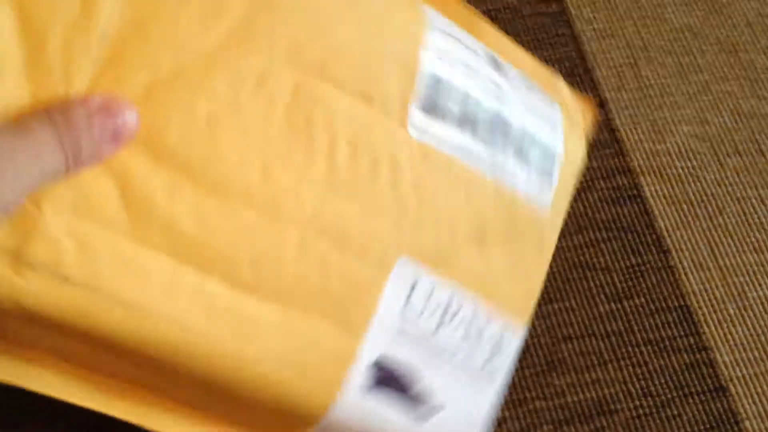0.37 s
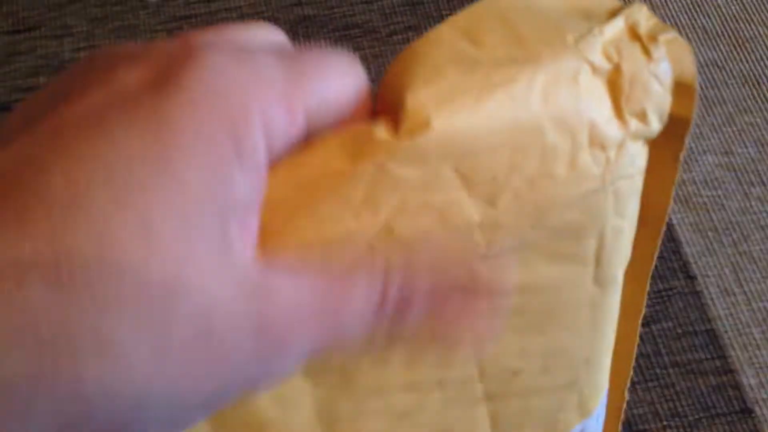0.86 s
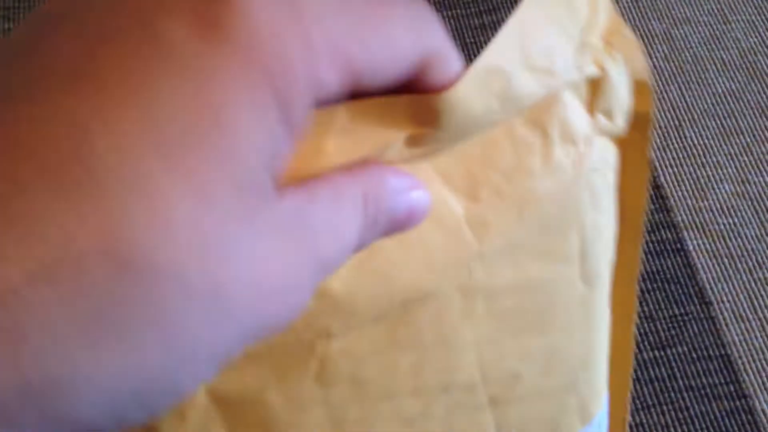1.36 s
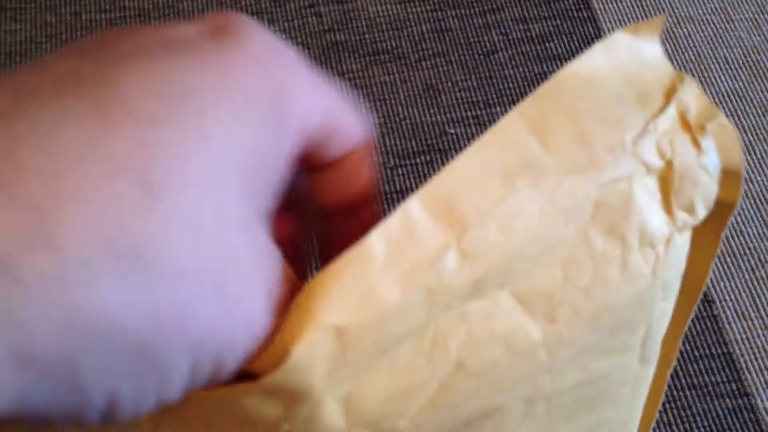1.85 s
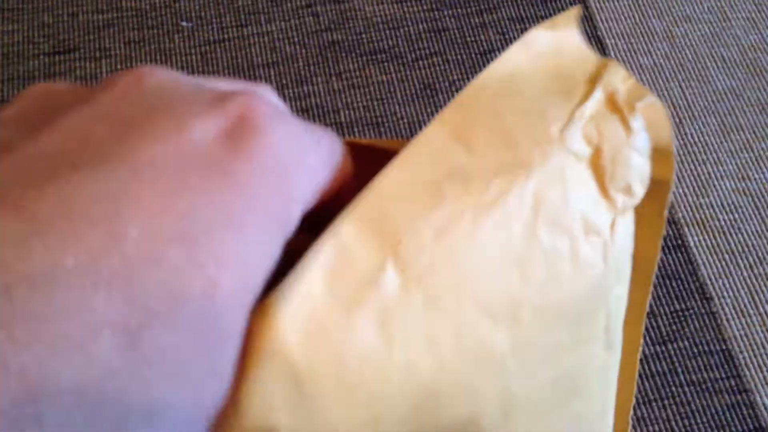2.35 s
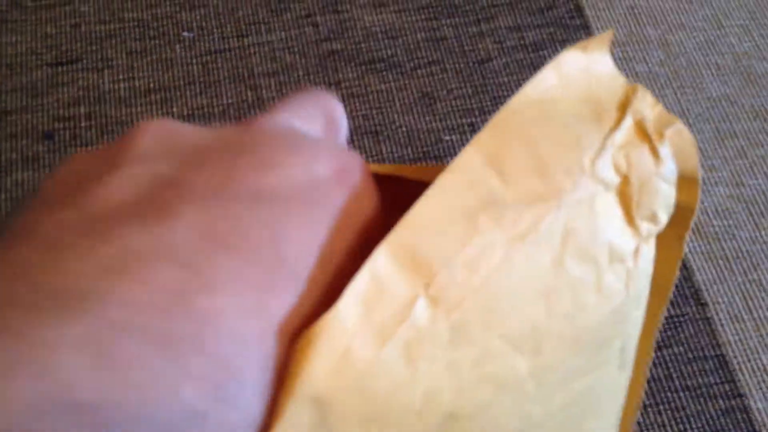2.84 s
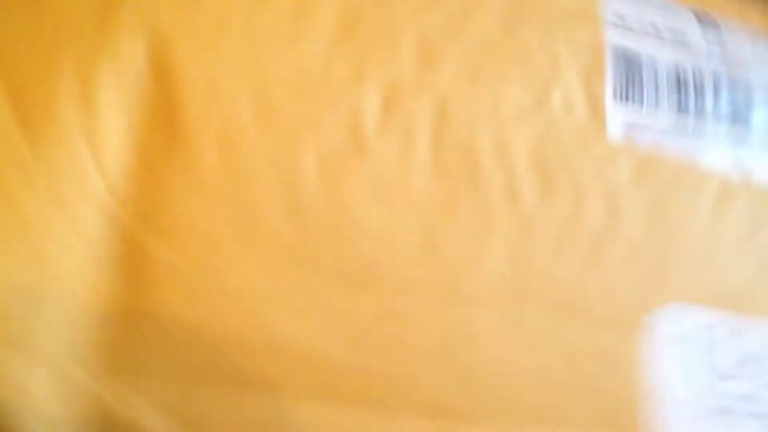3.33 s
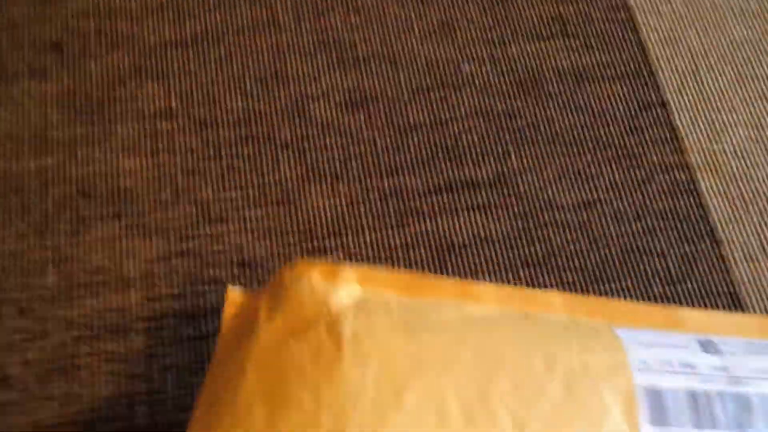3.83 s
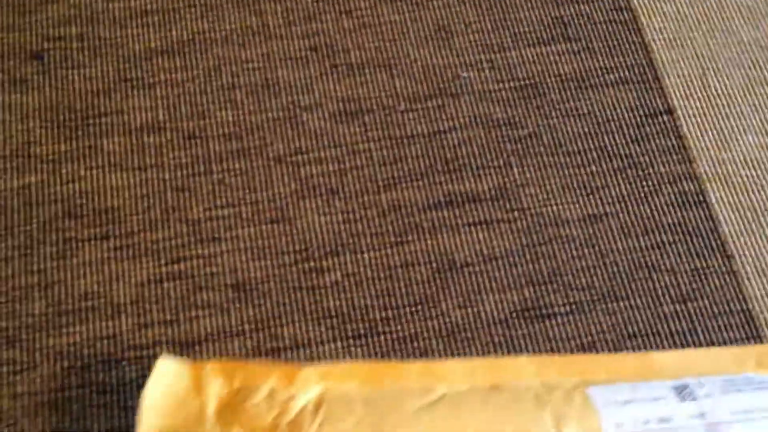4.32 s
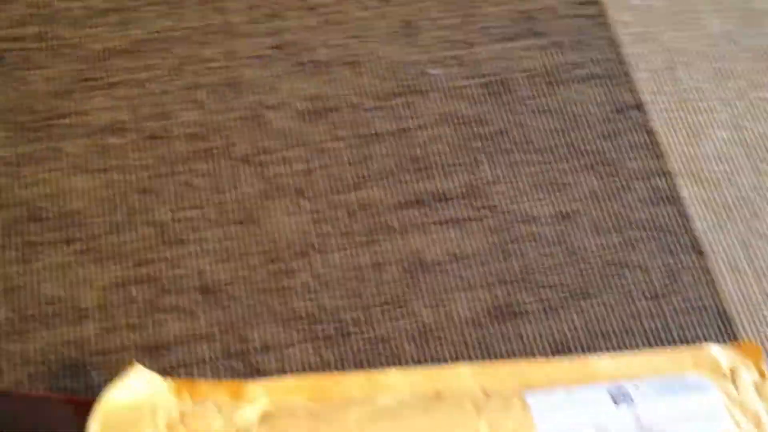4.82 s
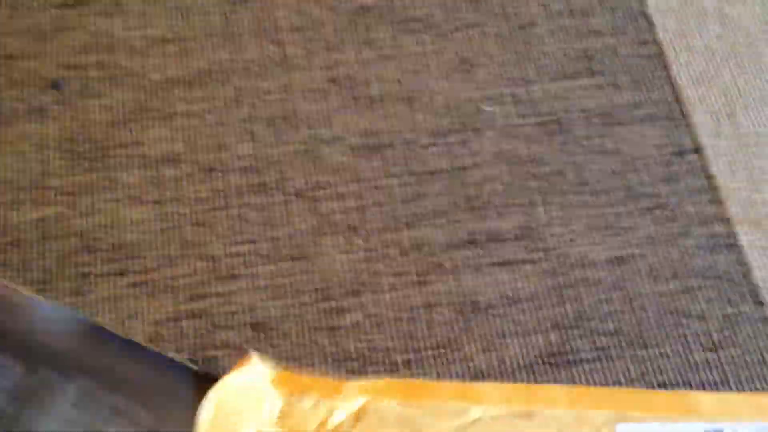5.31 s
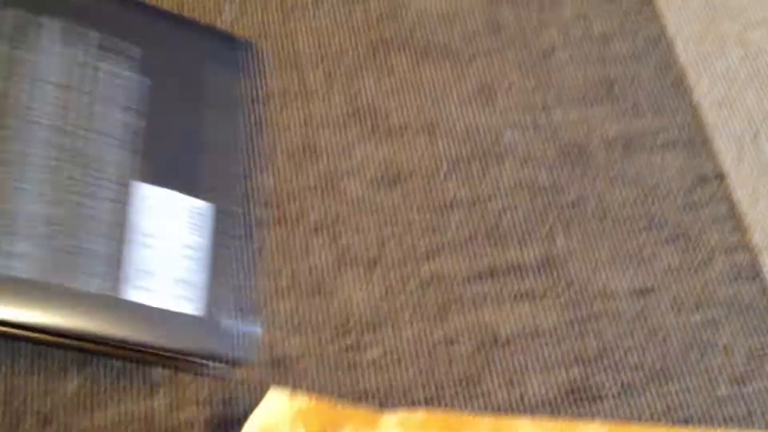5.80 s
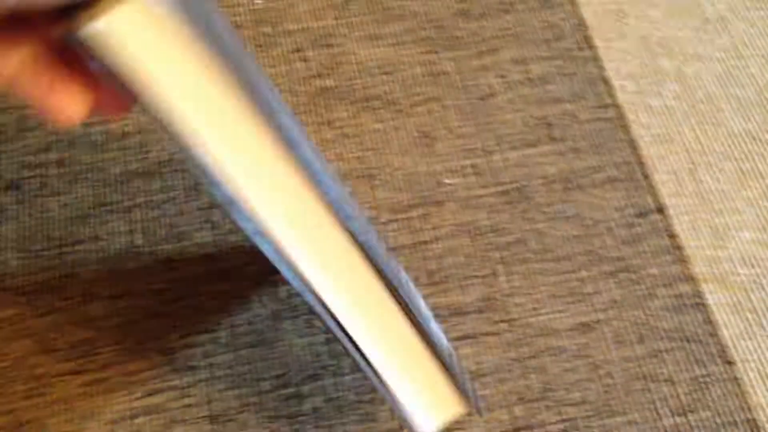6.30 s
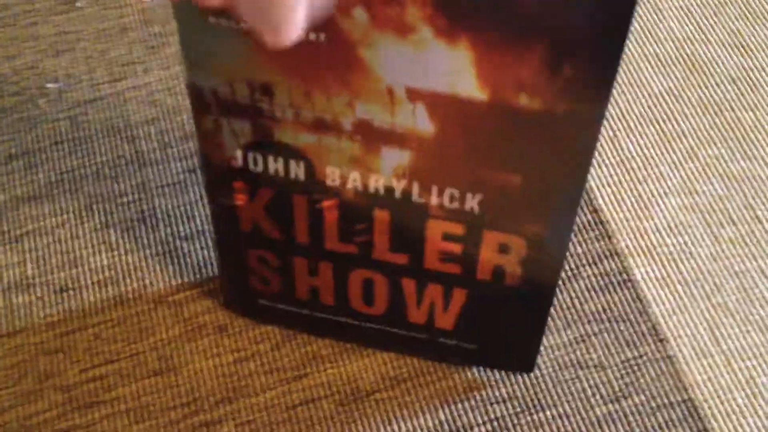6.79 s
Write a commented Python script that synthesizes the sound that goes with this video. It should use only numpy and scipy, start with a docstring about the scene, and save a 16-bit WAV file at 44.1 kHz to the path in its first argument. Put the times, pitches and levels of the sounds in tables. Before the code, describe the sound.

Dry paper rubbing and a short ribbed buzz lead into a dense flurry of crisp crease snaps, easing into softer rustles and small padded bumps. After a lull comes a bright burst of crackle and long sliding hisses, then near quiet with tiny ticks and one solid knock on the mat. Close, thin, mono indoor sound with faint hush.

```python
"""Opening a padded envelope

A padded paper envelope is slid over a ribbed floor mat, handled and pulled open close to a small mono microphone;
then a book is drawn out, turned in the hand and stood on the mat. Rubbing is filtered noise and tiny clicks,
the ribs hum as a wavering tone, and snaps and thumps are short dying rings, the snaps with bursts of noise.
A short room tail and a steady hush surround it all."""
import sys
import numpy as np
from scipy import signal
from scipy.fft import rfft, irfft
from scipy.io import wavfile
from scipy.ndimage import uniform_filter1d

SR = 44100
rng = np.random.default_rng(int(sys.argv[2]) if len(sys.argv) > 2 else 0)


def dump_mix(stems):
    """Bounce the given channels to the path in sys.argv[1] as a 16-bit WAV at rate SR."""
    frames = np.atleast_2d(stems).T  # one column per channel
    limited = np.clip(frames, -1, 1)  # hard clip at full scale
    pcm = np.round(limited * 32767).astype(np.int16)
    wavfile.write(sys.argv[1], SR, pcm)


def voltage_ratio(level):
    """Linear amplitude factor for a level in decibels (scalar or array-like)."""
    return 10 ** (np.asarray(level, float) / 20)


N = 315932  # length in samples

# Skin, paper and mat rub, stroke after stroke. Each row: peak time in seconds, rise in seconds,
# fall in seconds, surface hiss in dB, rustle of the sheet above that hiss in dB.
STROKES = [(.21, 0.59, 0.019, -53, 3), (.41, .2, 0.091, -43, 0.5), (.51, 0.12, 0.056, -40.5, -3.5),
           (.61, .04, 0.046, -54.5, 6.5), (.677, 0.0054, 0.056, -49, 4.5), (.715, 0.044, .03, -44, 7),
           (.76, 0.043, 0.24, -51.5, 2.5), (1.004, 0.03, 0.08, -43.5, 3),
           (1.065, 0.076, 0.024, -45.5, -4.5), (1.15, 0.0092, 0.06, -54.5, 4.5),
           (1.195, 0.054, 0.087, -44, -5), (1.311, 0.094, 0.022, -47.5, -5), (1.37, .03, 0.015, -50, -12),
           (1.482, 0.098, 0.067, -49.5, -2.5), (1.561, 0.03, 0.12, -47.5, -8.5),
           (1.645, 0.064, 0.032, -46.5, -3), (1.713, 0.01, 0.059, -49, 0), (1.84, 0.054, 0.071, -52.5, -13),
           (1.9, 0.041, 0.029, -52.5, 7), (1.96, 0.14, 0.025, -49, -9), (2.09, 0.03, 0.15, -53, -3.5),
           (2.2, 0.077, 0.053, -56.5, 0.5), (2.303, 0.024, 0.033, -46.5, -4), (2.42, 0.076, 0.1, -50, -8),
           (2.49, 0.034, .1, -55, 1), (2.644, 0.16, 0.12, -44.5, -8), (2.965, 0.15, 0.03, -47, -7),
           (3.039, 0.035, 0.041, -46, -2.5), (3.178, 0.15, 0.1, -47.5, -4.5),
           (3.312, 0.098, 0.32, -53.5, -2.5), (3.7, 0.072, 0.16, -54, 5), (3.881, 0.036, 0.16, -53.5, 4),
           (4.18, 0.11, 0.1, -52.5, 1.5), (4.313, 0.053, 0.052, -53.5, -2), (4.53, 0.085, 0.34, -60, 7),
           (4.687, 0.017, 0.01, -33, -3), (4.7, 0.023, 0.23, -39.5, 0), (4.9, 0.42, 0.084, -40.5, -25),
           (5.04, 0.097, 0.11, -59.5, 7), (5.17, 0.15, 0.14, -43, -9), (5.27, 0.17, 0.12, -42.5, -13.5),
           (5.37, 0.18, 0.088, -43, -3), (5.46, 0.17, 0.039, -50, -7.5), (5.634, 0.013, 0.11, -70, 9),
           (6.06, 0.24, 0.33, -64, -12), (6.146, 0.0089, 0.032, -46, -14.5),
           (6.246, 0.066, 0.22, -53.5, -15.5), (6.43, 0.019, 0.49, -59.5, -21),
           (6.55, .01, 0.091, -51.5, -19), (6.62, 0.056, 0.039, -50, -15),
           (6.654, 0.013, 0.041, -51.5, 4.5), (6.711, 0.019, 0.045, -43, -3.5),
           (6.854, 0.19, 0.074, -58.5, -7.5), (7.014, 0.13, 0.049, -65, 0.5), (7.16, 0.14, .12, -61, -6.5)]
# How hard the package presses on the mat. Each row: time in seconds, basic rumble of the padded body in dB.
PRESSURE = [(0, -59.5), (.16, -65.5), (.3, -52.5), (.52, -50), (.64, -58), (1.41, -63.5), (1.54, -52),
            (1.65, -65), (1.87, -62.5), (2.55, -56.5), (2.69, -61), (3.65, -60), (4.49, -62), (4.85, -48),
            (4.98, -62), (5.18, -57.5), (5.34, -43.5), (5.5, -60), (5.9, -66), (7.16, -66)]
# Paper damped by the mat. Each row: resonance in Hz, width in Hz, relative strength in dB.
LYING_SHEET = [(674, 530, 6.5), (1530, 1040, 0), (2020, 270, -5)]
# Stiff paper held in the air. Each row: resonance in Hz, width in Hz, relative strength in dB.
HELD_SHEET = [(1187, 330, 5.5), (1380, 123, 11.5), (1980, 750, 6)]
# Padded pouch on the floor. Each row: resonance in Hz, width in Hz, relative strength in dB.
POUCH = [(239.5, 136, 12), (291, 100, -2)]
# Tone colour of the surface hiss. Each row: frequency in Hz, relative level in dB.
HISS_COLOUR = [(1180, -49), (2000, -11.5), (2870, -2), (4550, 2), (5180, -3), (6640, 3), (12600, -4),
               (14700, 1.5), (15500, -19)]
# The edge drags across the ribs of the mat. Each row: time in seconds, average ribs a second, average level in dB.
RIBS = [(0.27, 134, -55), (0.378, 163, -47), (0.442, 191, -45), (0.56, 204, -51)]
# Creases and covers snap. Each row: start in seconds, main ring in Hz, then the peaks of ring,
# crack and sizzle in dB.
SNAPS = [(0.474, 1450, -27.5, -33, -21.5), (0.576, 1000, -20.5, -24, -32), (0.577, 1930, -17.5, -28, -38),
         (0.799, 1560, -25.5, -17, -19.5), (0.973, 1110, -29.5, -67, -60), (0.989, 930, -25.5, -44, -47),
         (0.992, 1320, -23.5, -19, -20.5), (0.998, 940, -23.5, -17.5, -40), (1.003, 1367, -30, -32, -13.5),
         (1.02, 1230, -24.5, -21.5, -24), (1.224, 2720, -29, -31, -49), (1.251, 1250, -64, -52, -27.5),
         (1.3, 2500, -43, -28, -39), (1.326, 930, -33, -32, -40), (1.402, 1430, -20.5, -23.5, -32),
         (1.46, 1000, -26.5, -58, -37), (1.493, 1050, -36, -53, -59), (1.516, 1260, -27.5, -68, -67),
         (1.551, 1390, -37, -30.5, -28), (1.62, 1320, -31, -45, -49), (1.693, 1900, -23.5, -20, -27),
         (1.714, 4170, -18.5, -17, -13.5), (1.72, 930, -31.5, -36, -27), (1.788, 1410, -31.5, -43, -51),
         (1.81, 1380, -56, -36, -47), (1.863, 1260, -46, -32, -28), (1.895, 2250, -26, -39, -27),
         (2.034, 1300, -35, -43, -37), (2.088, 900, -46, -45, -53), (2.11, 1380, -32, -52, -31),
         (2.13, 1310, -34, -43, -40), (2.19, 1280, -38, -67, -54), (2.212, 1340, -37, -53, -54),
         (2.302, 1280, -37, -33.5, -47), (2.367, 2520, -47, -43, -31), (2.392, 920, -36, -43, -49),
         (2.415, 1090, -38.5, -35, -51), (2.432, 2600, -30, -35, -27), (2.491, 1420, -37, -44, -47),
         (2.521, 1060, -31.5, -39, -33), (2.682, 1260, -29, -59, -49), (2.911, 1110, -46, -30, -61),
         (2.944, 1160, -32, -58, -41), (2.956, 1340, -41, -32.5, -23), (3.154, 1070, -27.5, -28, -28),
         (3.181, 1220, -31.5, -27, -43), (3.188, 1340, -43, -25, -36), (3.2, 1210, -35, -43, -44),
         (3.25, 990, -35, -45, -53), (3.712, 2010, -29, -52, -56), (3.747, 740, -33, -60, -55),
         (3.8589, 630, -38, -31.5, -36), (3.882, 1450, -30, -36, -26), (4.126, 720, -37, -27, -46),
         (4.163, 744, -34.5, -42, -37), (4.202, 2050, -27, -39, -33), (4.203, 730, -38, -48, -56),
         (4.283, 4600, -35, -42, -32), (4.378, 636, -39.5, -58, -65), (4.404, 670, -46, -41, -50),
         (4.434, 2600, -71, -58, -38), (4.469, 745, -38, -73, -68), (4.503, 1640, -26.5, -31, -51),
         (4.614, 1110, -33, -35, -30.5), (4.676, 1030, -38, -26, -15), (4.6914, 2110, -19, -16.5, -15),
         (4.7167, 3400, -19, -22, -19), (4.718, 740, -21.5, -16, -16), (4.742, 1880, -22, -45, -40),
         (4.801, 1900, -27, -54, -18.5), (4.904, 607, -33.5, -44, -53), (5.007, 2000, -46, -35, -34),
         (5.32, 1530, -27.5, -30, -27), (5.333, 1120, -30, -37, -37), (5.356, 640, -24, -20.5, -30),
         (5.369, 1220, -33, -27, -32), (5.63, 2370, -38.5, -49, -42), (5.765, 3270, -42, -48, -51),
         (5.868, 2920, -41, -46, -57), (5.913, 3740, -43.5, -54, -61), (6.152, 1220, -52, -46, -25),
         (6.173, 864, -46, -49, -45), (6.235, 3910, -44, -44, -34), (6.268, 4400, -47, -46, -35),
         (6.348, 3880, -59, -42, -30.5), (6.434, 3750, -61, -48, -38), (6.492, 4600, -57, -43, -44),
         (6.526, 3100, -62, -48, -41), (6.543, 4660, -49, -42, -23), (6.585, 2660, -48, -39, -39),
         (6.604, 4550, -34, -40, -28), (6.629, 2800, -47, -37, -46), (6.649, 1100, -26.5, -39, -53),
         (6.709, 1050, -29, -40, -42), (6.711, 5170, -24, -35, -22), (6.714, 1390, -30, -24.5, -31),
         (6.86, 3970, -73, -41, -36)]
# Thumps on the mat. Each row: start in seconds, peak in dB, main ring in Hz.
THUMPS = [(0.676, -39, 256), (1.018, -27, 225), (1.402, -38.5, 328), (1.438, -41, 220), (1.9, -38.5, 248),
          (2.211, -42, 320), (2.391, -39.5, 210), (2.523, -31, 247), (2.683, -39, 275), (3.197, -48, 370),
          (3.6, -36.5, 374), (3.629, -41, 294), (3.69, -32.5, 255), (3.706, -35.5, 305), (3.747, -34, 335),
          (3.882, -35, 398), (3.895, -29, 317), (4.378, -44, 395), (4.444, -47, 455), (4.469, -41, 397),
          (4.526, -43, 260), (4.672, -31, 344), (4.714, -30.5, 372), (4.976, -43, 347), (5.164, -44, 286),
          (5.307, -45, 268), (5.348, -34, 266), (5.43, -34, 285), (5.459, -36.5, 295), (5.479, -41, 284),
          (6.649, -19, 297), (6.664, -26.5, 283), (6.68, -32, 280), (6.712, -36, 290)]
# Tone colour of the steady hush. Each row: frequency in Hz, relative level in dB.
HUSH_COLOUR = [(24, -50), (40, 71), (235, 29), (496, -5), (1820, -10.5), (3840, -3.5), (5170, -31),
               (6480, -13.5), (13300, -46), (15500, 30)]
# How fast the room dies away. Each row: frequency in Hz, time to fall 60 dB in seconds.
ROOM_DECAY = [(250, 0.2), (1000, 0.12), (8000, 0.042)]
# Microphone port, a peak and the dip above it. Each row: centre in Hz, width in Hz, gain in dB.
PORT = [(4770, 1280, 3), (5070, 290, -5.5)]

HUSH_DB, ROOM_DB = -68, -15.5
LAID_DOWN_S = 3.4  # from here on the sheet lies on the mat
BOOK_S = 6.1  # from here on fingers slide over the smooth book jacket, a thinner hiss
EDGE_DB, ROUND = 13.5, 1.26  # a stroke is this much softer at both ends; larger ROUND gives a flatter top
STOP_DB = 17  # past its ends the hand has stopped and the sound drops faster
FOLLOW = 0.92  # share of the rustle's swings (in dB) that the pouch rumble follows
REST_DB, REST_RUSTLE_DB = -65.5, 3.5  # contact between strokes: hiss, and rustle above that hiss
LET_GO_S, LET_GO_DB = 5.55, -9  # the resting contact gets fainter once the package is let go


def decay(t, t60):
    """A dying sound falls 60 dB in t60 seconds."""
    return voltage_ratio(-60 * t / t60)


def evened(x):
    """Scales to an average strength (rms) of 1."""
    return x / np.sqrt(np.mean(x ** 2) + 1e-20)


def add(mix, s, sound):
    """Mixes a sound in at time s, in seconds."""
    part = mix[round(s * SR):][:len(sound)]
    part += sound[:len(part)]


def coloured(x, points):
    """Filters x by a spectrum of (Hz, dB) points, then evens its strength."""
    hz, db = np.transpose(points)
    bins = np.fft.rfftfreq(len(x), 1 / SR)
    gain = voltage_ratio(np.interp(np.log(bins + 1), np.log(hz + 1), db))
    return evened(irfft(rfft(x) * gain, len(x)))


def butter(x, order, hz, kind):
    """A smooth filter that keeps the highs ("high") or a band ("band")."""
    return signal.sosfilt(signal.butter(order, hz, kind, fs=SR, output="sos"), x)


def resonate(x, hz, width):
    """A resonance of gain 1 at its centre."""
    return signal.lfilter(*signal.iirpeak(hz, hz / width, SR), x)


def ringing(drive, resonances):
    """A material answers the friction that drives it with several resonances at once."""
    return evened(sum(voltage_ratio(db) * resonate(drive, hz, width) for hz, width, db in resonances))


def wander(size):
    """Slow random drift: noise averaged over this many samples."""
    return evened(uniform_filter1d(rng.standard_normal(N), size=size))


def hush():
    """The steady hush of the quiet room is coloured noise."""
    return voltage_ratio(HUSH_DB) * coloured(rng.standard_normal(N), HUSH_COLOUR)


def strokes():
    """Levels (dB) of hiss and rustle: every stroke swells and dies away over a faint resting contact."""
    t = np.arange(0, N / SR + .002, .001)
    s, rise, fall, hiss_db, above_db = np.transpose(STROKES)[:, :, None]
    # distance from the peak: 0 at the peak, 1 at either end
    away = np.where(t < s, (s - t) / np.maximum(rise, .004), (t - s) / np.maximum(fall, .004))
    swell_db = hiss_db - EDGE_DB * away ** ROUND - STOP_DB * np.maximum(away - 1, 0) ** 2
    rest_db = REST_DB + LET_GO_DB * np.clip((t - LET_GO_S) / 0.11, 0, 1)
    hiss = voltage_ratio(rest_db) ** 2 + (voltage_ratio(swell_db) ** 2).sum(0)
    rustle = voltage_ratio(rest_db + REST_RUSTLE_DB) ** 2 + (voltage_ratio(swell_db + above_db) ** 2).sum(0)
    return [np.interp(np.arange(N) / SR, t, 10 * np.log10(power)) for power in (hiss, rustle)]


def slips(per_s, spread_db, smooth):
    """Tiny stick-slip clicks in clumps, a few of them large, over a share of smooth friction noise."""
    clumps = voltage_ratio(4 * wander(500))  # makes clicks more or less likely than per_s
    size = voltage_ratio(spread_db * np.minimum(rng.exponential(1, N), 4)) * rng.choice([-1., 1.], N)
    clicks = evened(size * (rng.random(N) < per_s * clumps / SR))
    return smooth * rng.standard_normal(N) + clicks


def patchy(x, spread_db):
    """The touched area keeps changing, so bands swell and fade apart from each other."""
    z = signal.stft(x, nperseg=256)[2]
    luck = rng.standard_normal(z.shape)
    patches = evened(uniform_filter1d(uniform_filter1d(luck, size=12, axis=0), size=10, axis=1))
    return evened(signal.istft(z * voltage_ratio(spread_db * patches), nperseg=256)[1][:N])


def surface_hiss(level_db):
    """Skin and covers rub as coloured friction noise, brighter when the stroke is louder."""
    t = np.arange(N) / SR
    paper = coloured(slips(per_s=2000, spread_db=3.5, smooth=1.8), HISS_COLOUR)
    sticky = coloured(slips(per_s=400, spread_db=3.5, smooth=1.3), HISS_COLOUR)
    glossy = butter(sticky, 3, 4000, "high")
    hiss = patchy(np.where(t < BOOK_S, paper, glossy), spread_db=2.5)
    top = butter(hiss, 2, 7500, "high")
    brightness = voltage_ratio(0.12 * (level_db + 49.5))
    return hiss + (brightness - 1) * top


def crinkles(count=24, per_s=530, cycles=9):
    """Small folds pop all over the sheet, each patch at its own pitch."""
    t, out = np.arange(SR // 30) / SR, np.zeros(N)
    size = voltage_ratio(4 * np.minimum(rng.exponential(1, N), 3)) * (rng.random(N) < per_s / SR)
    patch = rng.integers(0, count, N)
    for k, hz in enumerate(np.geomspace(600, 7000, count)):
        pop = np.sin(2 * np.pi * hz * t) * decay(t, cycles / hz)
        out += signal.oaconvolve(size * (patch == k), evened(pop))[:N]
    return evened(out)


def sheet_rustle():
    """Friction makes the stiff sheet resonate, in the air and then on the mat, while folds pop."""
    drive = slips(per_s=500, spread_db=4.0, smooth=1.21)
    held, lying = ringing(drive, HELD_SHEET), ringing(drive, LYING_SHEET)
    sheet = np.where(np.arange(N) / SR < LAID_DOWN_S, held, lying)
    return sheet + voltage_ratio(-4.0) * crinkles()


def pouch_rumble():
    """Rough friction makes the padded pouch resonate low, unevenly as the grip varies."""
    drive = slips(per_s=200, spread_db=2.5, smooth=1.33)
    return ringing(drive, POUCH) * voltage_ratio(3.1 * wander(2500))


def rubbing():
    """Strokes make the surface hiss; bending makes the sheet rustle and the pouch rumble."""
    level_db, rustle_db = strokes()
    stroke = voltage_ratio(level_db) * surface_hiss(level_db) + voltage_ratio(rustle_db) * sheet_rustle()
    # quick rises and falls around the average over a third of a second
    swings_db = rustle_db - uniform_filter1d(rustle_db, size=SR // 3)
    press_db = np.interp(np.arange(N) / SR, *np.transpose(PRESSURE))
    return stroke + voltage_ratio(press_db + FOLLOW * swings_db) * pouch_rumble()


def room(x):
    """Sparse reflections of random sign, each band dying at its own speed."""
    taps = np.zeros(SR // 2)
    at = np.arange(160, len(taps) - 22, 22)  # one reflection somewhere in every 22 samples
    taps[at + rng.integers(0, 22, len(at))] = rng.choice([-1., 1.], len(at))
    hz, t, z = signal.stft(taps, SR, nperseg=256)
    known_hz, known_t60 = np.transpose(ROOM_DECAY)
    t60 = np.interp(np.log(hz + 1), np.log(known_hz), known_t60)
    tail = signal.istft(z * decay(t, t60[:, None]), SR, nperseg=256)[1]
    return signal.fftconvolve(x, tail / np.linalg.norm(tail))[:N]


def ribs():
    """Each rib of the mat gives one soft uneven push: a low wavering hum. Returns its start and sound."""
    s, per_s, level_db = np.transpose(RIBS)
    t = np.arange(s[0], s[-1], 1 / SR)
    waver = evened(uniform_filter1d(rng.standard_normal((2, len(t))), size=400))
    turns = np.cumsum(np.interp(t, s, per_s) * (1 + 0.027 * waver[0])) / SR
    hum = np.sin(2 * np.pi * turns) + 0.64 * np.sin(4 * np.pi * turns)
    level = voltage_ratio(np.interp(t, s, level_db) + 1.4 * waver[1])
    return s[0], level * evened(hum) * signal.windows.tukey(len(t), .3)  # fades in and out


def snap(hz, ring_db, crack_db, sizzle_db, luck, cycles=13, crack_t60=0.011):
    """A crease buckles: plate modes that die within some cycles, a dry crack and a thin sizzle above it."""
    t = np.arange(len(luck)) / SR
    detune = 1 + 0.057 * luck[:4, None] * [[0], [1], [1], [1]]  # the main mode keeps its pitch
    modes = hz * np.array([[1.], [1.4], [1.9], [.7]]) * detune
    heights = voltage_ratio(np.array([[0.], [-8], [-11], [-12]]) + 5.2 * luck[4:8, None])
    ring = (heights * np.sin(2 * np.pi * modes * t) * decay(t, cycles / modes)).sum(0)
    ring = ring * (1 - np.exp(-t * hz / 0.25))  # the plate takes a moment to swing
    out = voltage_ratio(ring_db) * ring / abs(ring).max()
    burst = luck * decay(t, crack_t60) + 7 * (t == 0)  # one clean break, then splinters
    for band_hz, db in (([2300, 5600], crack_db), ([4600, 11800], sizzle_db)):
        part = butter(burst, 2, band_hz, "band")
        out = out + voltage_ratio(db) * part / abs(part).max()
    return out


def thump(peak_db, hz):
    """A soft blow: three close floor modes with a rounded start."""
    t = np.arange(SR // 3) / SR
    modes = ((1, 1), (0.27, 1.37), (0.58, 0.776))  # height and pitch, relative to the main mode
    ring = sum(height * np.sin(2 * np.pi * ratio * hz * t) for height, ratio in modes)
    ring = ring * decay(t, t60=.03) * (1 - np.exp(-t / 0.0023))
    return voltage_ratio(peak_db) * ring / abs(ring).max()


def scene():
    """Everything happens within arm's reach; the room adds a short tail and a steady hush."""
    near = rubbing()
    add(near, *ribs())
    for (s, *row), luck in zip(SNAPS, rng.standard_normal((len(SNAPS), SR // 20))):
        add(near, s, snap(*row, luck))
    for s, *row in THUMPS:
        add(near, s, thump(*row))
    mono = near + voltage_ratio(ROOM_DB) * room(near) + hush()
    return np.tile(mono, (2, 1))  # the same sound on both sides


def low_pass(x):
    """Removes everything above the highest recorded frequency."""
    return signal.sosfilt(signal.butter(12, 16480, fs=SR, output="sos"), x)


def record(dry):
    """A small capsule: steep bass cut, a port resonance and a sharp treble edge."""
    lean = butter(dry, 5, 170, "high")
    lean = lean + voltage_ratio(-20) * resonate(dry, 105, 50) + voltage_ratio(-33) * dry  # a trace of deep bass leaks through
    bright = lean + sum((voltage_ratio(db) - 1) * resonate(lean, hz, width) for hz, width, db in PORT)
    edged = signal.sosfilt(signal.cheby2(10, 40, 15600, fs=SR, output="sos"), bright)
    return low_pass(edged)


dry = scene()
out = record(dry)
dump_mix(out)
```